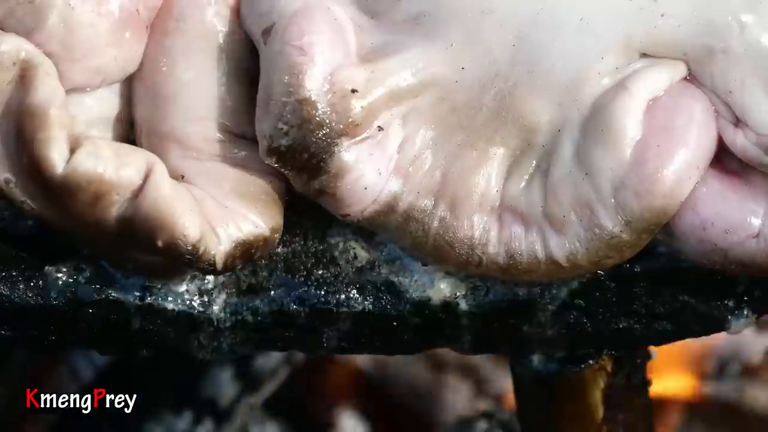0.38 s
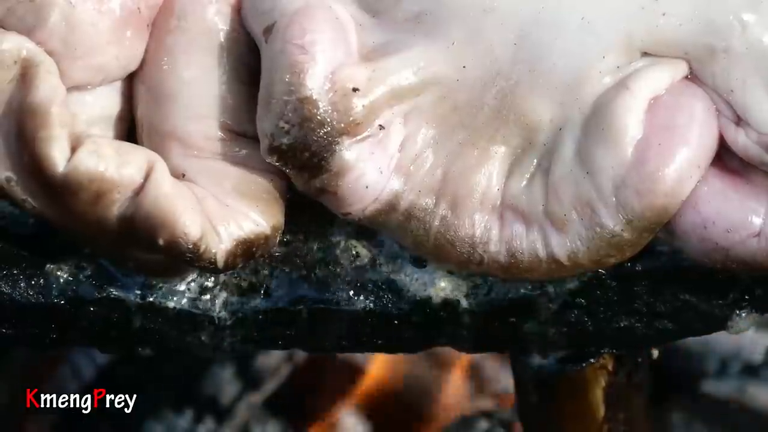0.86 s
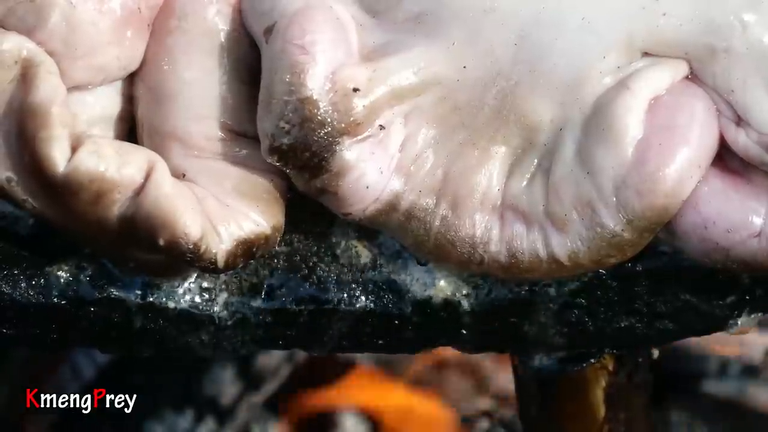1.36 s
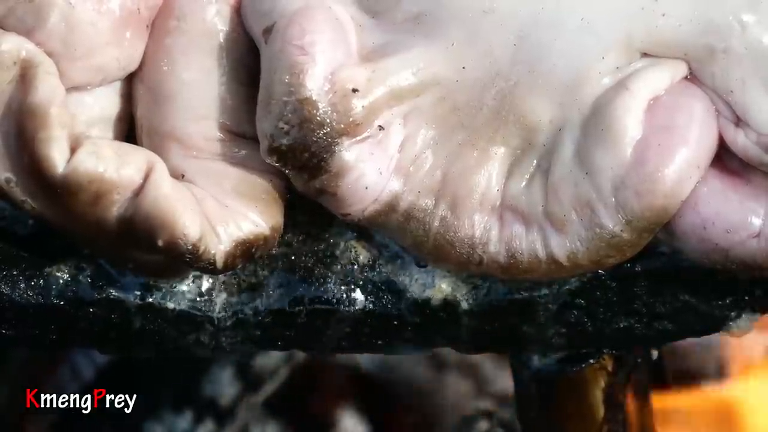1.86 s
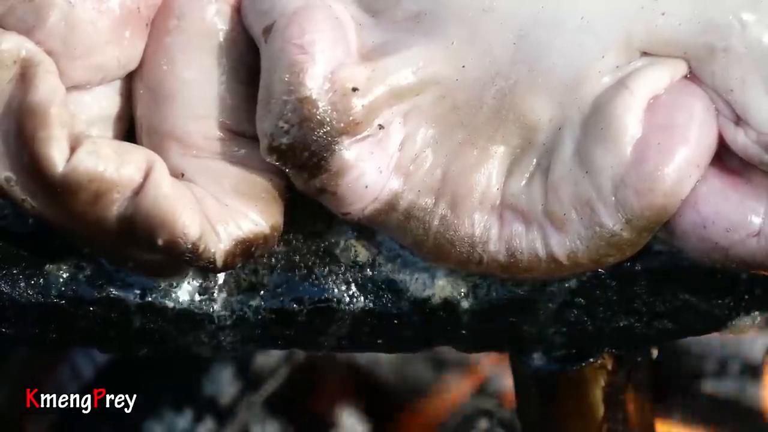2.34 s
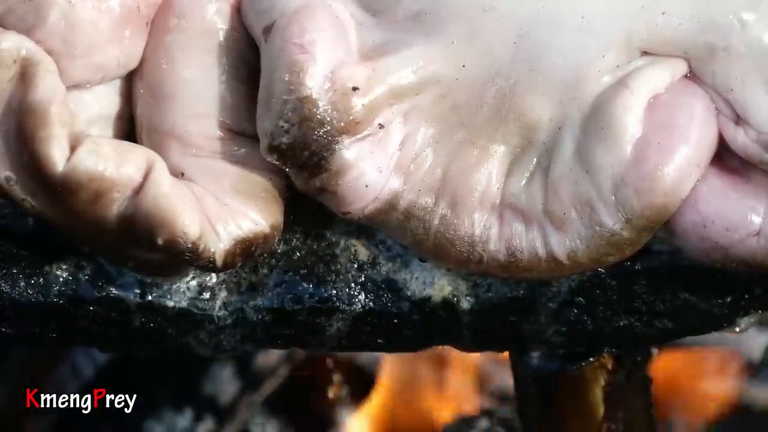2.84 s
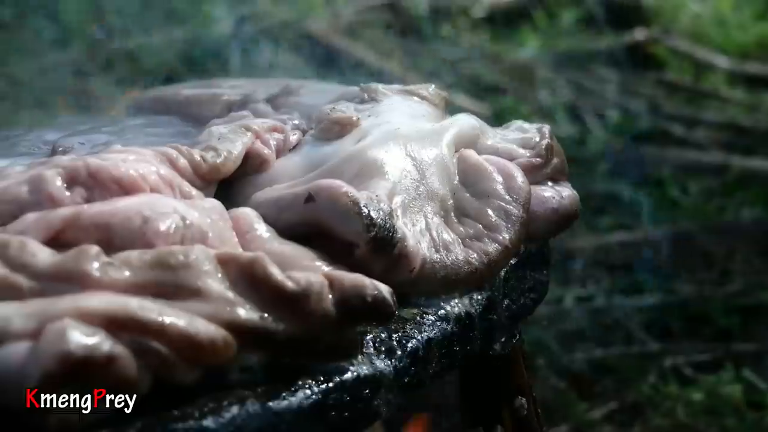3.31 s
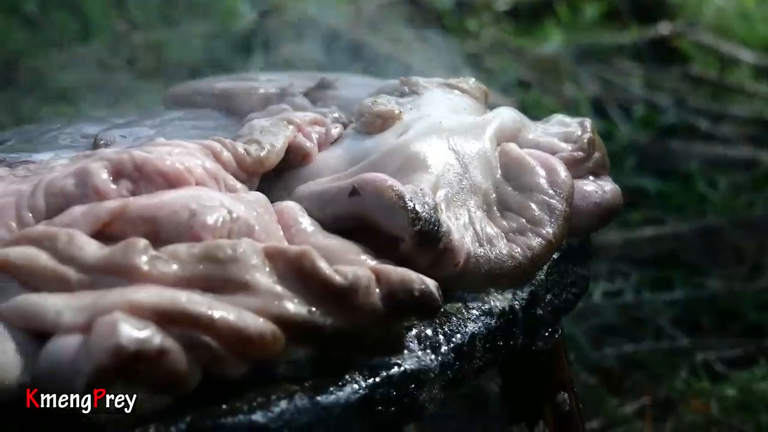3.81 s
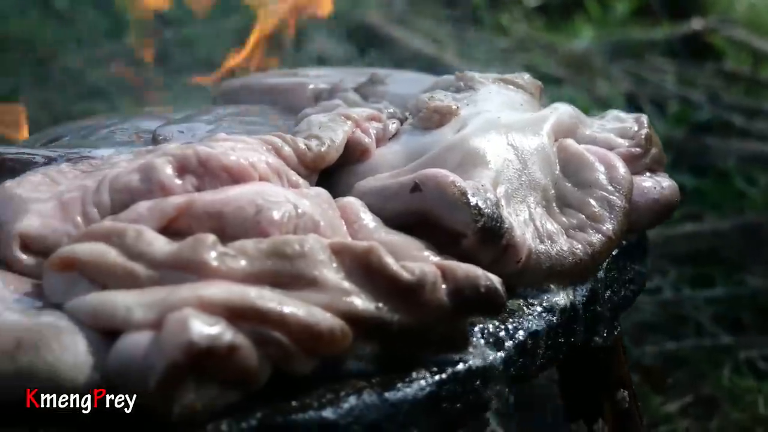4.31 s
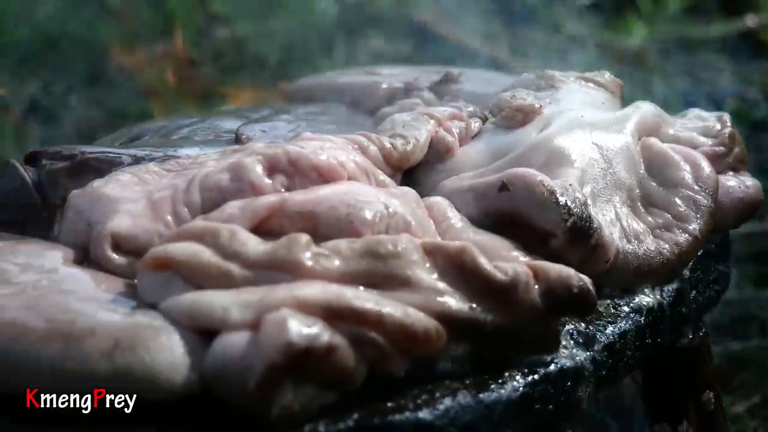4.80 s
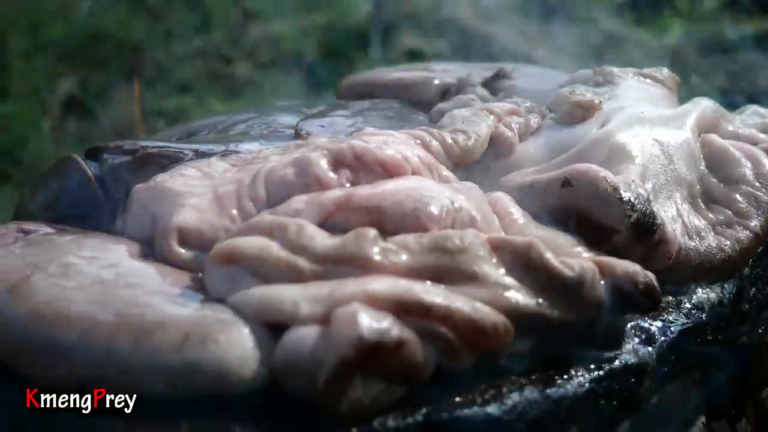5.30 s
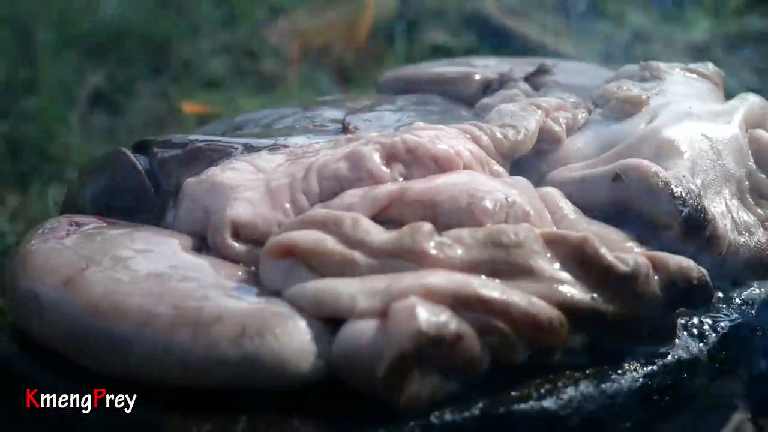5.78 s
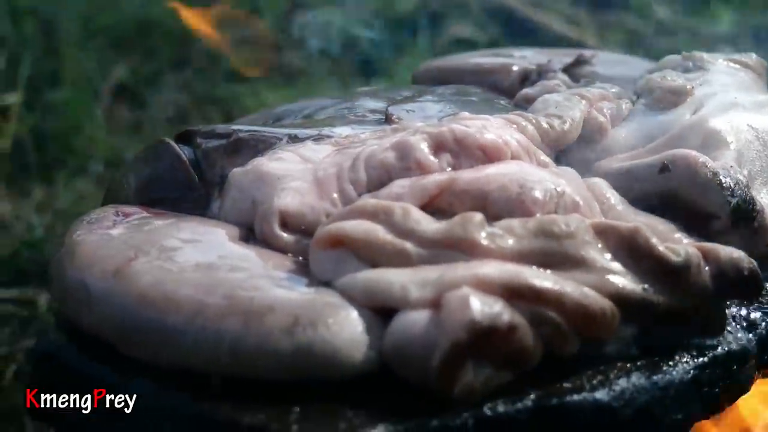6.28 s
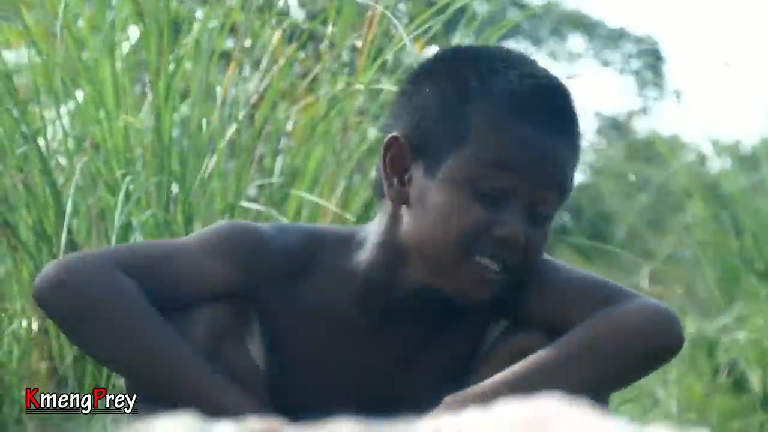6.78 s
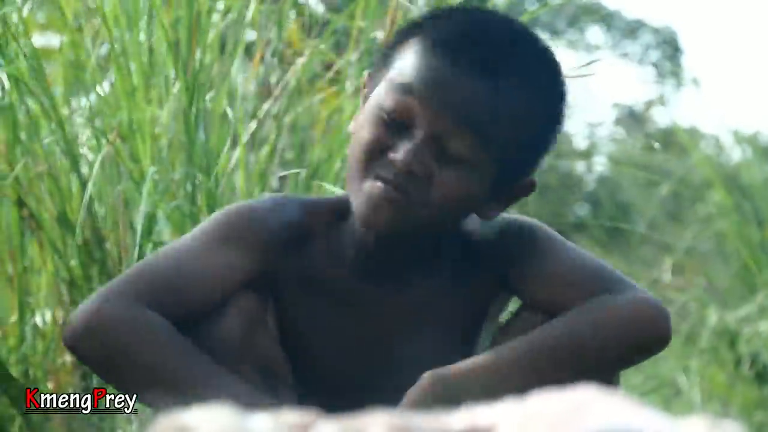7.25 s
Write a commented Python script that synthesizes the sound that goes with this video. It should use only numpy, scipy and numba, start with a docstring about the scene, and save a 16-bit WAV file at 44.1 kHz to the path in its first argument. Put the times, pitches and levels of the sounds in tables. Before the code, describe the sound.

Hollow wooden pounding, about four blows a second at times, over bright crackling fat and low flame flutter, cutting abruptly between near and duller sizzle.

```python
"""Meat sizzles on a hot stone over an open fire while a wooden pestle pounds a wooden mortar nearby.
Four passages are spliced: 0 s, fluttering fire (slow noise) over dull sizzle (hiss, dense bubble bursts and
pops); first blow at 0.12 s (damped modes, crack, soft very low swing); 0.19 and 3.29 s, bright sizzle over
the fire, with brief grainy sprays (noise); 6.49 s, fire over dull sizzle again. After hard blows a late gain
control ducks everything, clipping the first cycles, and the sizzle swells back."""
import sys
import numpy as np
from scipy import signal
from scipy.fft import rfft, irfft, next_fast_len
from scipy.io import wavfile
from scipy.ndimage import uniform_filter1d, minimum_filter1d
from numba import njit

SR = 44100
rng = np.random.default_rng(int(sys.argv[2]) if len(sys.argv) > 2 else 0)


def invert_db(level):
    """Linear amplitude ratio for a level in decibels (20 dB per decade), elementwise."""
    return 10 ** (np.asarray(level, dtype=float) / 20)


def generate_wav(signal):
    """Clip the signal to [-1, 1] and save it as 16-bit WAV at the path in sys.argv[1]."""
    frames = np.transpose(np.atleast_2d(signal))
    scaled = np.clip(frames, -1, 1) * 32767
    pcm = np.round(scaled).astype(np.int16)
    wavfile.write(sys.argv[1], SR, pcm)


N = 336483
T = np.arange(N) / SR


def colour(x, spectrum):
    """Shape a sound by a spectrum, linear in dB over log frequency; rms 1."""
    hz, level_db = np.transpose(spectrum)
    size = next_fast_len(N)
    bin_hz = np.maximum(np.arange(size // 2 + 1) * SR / size, 1)
    gain = invert_db(np.interp(np.log(bin_hz), np.log(hz), level_db))
    y = irfft(rfft(x, size) * gain, size)[:N]
    return y / y.std()


def walk(rate_hz):
    """Random levels held 1 / rate_hz and slewed twice; spread near 1."""
    k = int(SR / rate_hz)
    steps = np.repeat(rng.standard_normal(N // k + 1), k)
    return 1.12 * uniform_filter1d(uniform_filter1d(steps, k), k)[:N]


def filtered(x, order, hz, kind="low"):
    """Butterworth filter."""
    return signal.lfilter(*signal.butter(order, hz, kind, fs=SR), x)


def add(out, start_s, shapes):
    """Mix each row of shapes into out at its time."""
    at = (np.asarray(start_s) * SR).astype(int)[:, None] + np.arange(shapes.shape[1])
    np.add.at(out, np.minimum(at, len(out) - 1), shapes * (at < len(out)))


def bursts(start_times_s, size, pitch_hz, width_hz, phase_turns):
    """Bubbles bursting: a swing or two at their pitch, damped by their width."""
    u, out = np.arange(64) / SR, np.zeros(N)
    pitch_hz = np.clip(pitch_hz, 300, 15000)[:, None]
    width_hz = np.clip(width_hz, 900, 12000)[:, None]
    rise = 1 - np.exp(-u / 3e-5)
    decay = np.exp(-2.4 * width_hz * u)
    swing = np.sin(2 * np.pi * (pitch_hz * u + phase_turns[:, None]))
    add(out, start_times_s / 1 - 1e-4, size[:, None] * rise * decay * swing)
    return out


# Spliced passages: (start_s, carried_gain_reduction_db, sizzle_lowpass_hz, fire_over_sizzle_db before flares)
PASSAGES = [(0, 3.5, 9800, 4.5), (0.191, 10, 18900, -14.5), (3.292, 6, 20200, -12), (6.491, 16, 8200, 2)]


def passage(s, values):
    """The value, of one for each passage, that holds at time s."""
    starts_s = [row[0] for row in PASSAGES]
    return np.asarray(values)[np.maximum(np.searchsorted(starts_s, s, "right") - 1, 0)]


# Fire spectrum: (frequency_hz, relative_level_db)
FIRE_SPECTRUM = [(15, -37), (25, -19.5), (137, -6), (499, -1), (604, -1), (658, -0.5), (944, -4.5),
                 (1350, -9.5), (2670, -8.5), (4000, -17.5), (5200, -19), (8800, -120)]
# Flames flare up or sink: (centre_s, level_change_db, gaussian_length_s)
FLARES = [(1.538, 6, 0.075), (3.2, -2, .2), (3.5, 3.5, 0.18), (5.084, 3, .08), (5.623, 0, .08),
          (5.99, 4.5, 0.29), (6.453, 14.5, 0.11), (6.533, -9.5, 0.12), (7.39, 9, 0.065)]


def fire():
    """Low flutter of flames and draught: coloured noise with slow level swings and Gaussian flares."""
    flutter_db = 3.14 * walk(30) + 0.5 * walk(6)
    flare_db = sum(level_db * np.exp(-((T - centre_s) / length_s) ** 2)
                   for centre_s, level_db, length_s in FLARES)
    over_sizzle_db = passage(T, [row[-1] for row in PASSAGES])
    return colour(rng.standard_normal(N), FIRE_SPECTRUM) * invert_db(flutter_db + flare_db + over_sizzle_db)


# Sizzle spectrum: (frequency_hz, relative_level_db)
SIZZLE_SPECTRUM = [(410, -53), (700, -24), (1060, -12), (2130, -21), (2660, -14), (5610, -9.5), (6650, -8),
                   (7890, -11.5), (10400, -8.5), (14200, -10), (16000, -18.5)]
CRACKLE_RATE_PER_S, CRACKLE_DB, CRACKLE_SPREAD_DB, HISS_DB = 2500, 6, 4.5, 2.5


def frying_bed():
    """Hiss of steam and a dense crackle of bubbles of all sizes, duller from far off."""
    when, big, pitch, wide, phase = rng.random((int(np.ceil(CRACKLE_RATE_PER_S * N / SR)), 5)).T
    size = invert_db(np.minimum(-CRACKLE_SPREAD_DB * np.log(big), 16))
    pitch_hz = 1500 * 9.0 ** pitch
    crackle = bursts(when * N / SR, size * np.sqrt(pitch_hz), pitch_hz,
                     pitch_hz * (0.37 + 0.86 * wide), phase)
    hiss = rng.standard_normal(N) * invert_db(HISS_DB + 2.2 * walk(40))
    mix = hiss + invert_db(CRACKLE_DB) * crackle / crackle.std()
    bed = colour(mix, SIZZLE_SPECTRUM) * invert_db(1.26 * walk(21))
    out = np.zeros(N)
    for start_s, _, lowpass_hz, *_ in PASSAGES:
        heard = filtered(bed, 2, min(lowpass_hz, 21000))
        out = np.where(T >= start_s, heard / heard.std(), out)
    return out


# Loudest bursting fat bubbles: (start_s, relative_level_db, pitch_hz)
POPS = [(.3374, 33.5, 4770), (1.0657, 23, 7150), (1.1015, 37, 8100), (1.1159, 38, 9900), (1.1263, 36, 5300),
        (1.1656, 32, 7000), (1.181, 41, 8900), (1.37, 41, 7400), (1.5204, 32, 6200), (1.6413, 37, 6560),
        (1.7314, 39, 6600), (2.0048, 33, 4500), (2.1225, 41, 6800), (2.3172, 34, 7100), (2.3893, 45, 9400),
        (2.4001, 39, 6050), (2.511, 38, 6200), (2.5273, 38.5, 6900), (2.642, 37, 11500),
        (2.8293, 35.5, 7100), (3.0899, 33, 4500), (3.1459, 32.5, 4800), (3.2939, 30, 5800),
        (3.3167, 34, 9300), (3.328, 40.5, 10200), (3.383, 32, 9500), (3.4224, 34.5, 10800),
        (3.435, 34, 5350), (3.474, 34, 7700), (3.657, 34, 5930), (3.7861, 33.5, 6200), (3.975, 40.5, 9100),
        (3.991, 39, 4500), (4.0591, 38, 4280), (4.2107, 37.5, 6275), (4.4682, 42.5, 8160),
        (4.5437, 30, 7600), (4.6597, 39, 7160), (4.689, 33.5, 6450), (4.75, 31, 7300), (4.8167, 31, 10600),
        (4.8557, 32.5, 5100), (4.8919, 35, 4860), (4.9002, 40.5, 7800), (4.924, 34.5, 7200),
        (5.2773, 38, 10400), (5.2847, 38, 8360), (5.3365, 33, 7400), (5.4299, 33, 5300), (5.4708, 34, 5300),
        (5.596, 36, 9400), (5.7044, 39, 8100), (5.8362, 37, 3500), (6.0277, 32.5, 7400), (6.302, 26, 10100),
        (6.4261, 45, 8350), (6.4595, 39, 5900), (6.713, 39, 4630), (6.7547, 38, 5300), (6.82, 26, 11000),
        (7.127, 40, 10800), (7.17, 28, 12000), (7.25, 36, 9000), (7.275, 28, 8000), (7.4, 30, 7000)]
POP_WIDTH_PER_PITCH, POPS_ABOVE_HZ, SPATTER_DB, SPATTER_DECAY_S = 1.02, 800, -10, .001
SMALL_POPS, SMALL_POP_MIN_DB, SMALL_POP_RANGE_DB = 260, 23, 9


def pops():
    """Single loud bubble bursts, listed and random, each trailed by a short spatter of droplets."""
    when, big, pitch = rng.random((SMALL_POPS, 3)).T
    small_db = SMALL_POP_MIN_DB + SMALL_POP_RANGE_DB * big ** 2
    small = np.transpose([when * N / SR, small_db, 4500 * 2.8 ** pitch])
    start_s, level_db, pitch_hz = np.vstack([POPS, small]).T
    wide, phase = rng.random((len(start_s), 2)).T
    width_hz = POP_WIDTH_PER_PITCH * pitch_hz * (0.54 + 1.32 * wide)
    # bubbles this small push no bass
    out = filtered(bursts(start_s, invert_db(level_db), pitch_hz, width_hz, phase), 2, POPS_ABOVE_HZ, "high")
    spatter = rng.standard_normal(256) * np.exp(-np.arange(256) / SR / SPATTER_DECAY_S)
    return out + invert_db(SPATTER_DB) * np.convolve(out, spatter / np.linalg.norm(spatter))[:N]


def sizzle():
    """Frying fat: steady bed plus pops, rms 1."""
    out = frying_bed() + pops()
    return out / out.std()


# Mortar modes: main, lower, upper, side, then those that hard contact wakes:
# (multiple_of_main_pitch, level_db, share_of_main_t60, sign)
MODES = [(1, 0, 1, 1), (.89, 0, 1, 1), (1.79, 0, .42, -1), (1.12, -20, .7, 1), (2.3, -7, .15, -1),
         (3.15, -9, .12, 1), (3.85, -10, .1, -1), (4.9, -22, .12, 1)]
# Mortar as heard in each passage: (lower_ring_db, upper_ring_db)
MORTAR_HEARD = [(-19, -5.5), (-44.5, -9.5), (-2, -11), (-3, -16)]
SETTLE_S = 0.022


def bowl_ring(u, start_s, pitch_hz, t60_s, hard_db):
    """Damped modes; the two close low ones beat, hard contact starts faster and wakes the upper ones."""
    lower_db, upper_db = (passage(start_s, column) for column in np.transpose(MORTAR_HEARD))
    chance = rng.standard_normal((len(start_s), len(MODES)))
    ring = 0
    for k, (multiple, mode_db, share, sign) in enumerate(MODES):
        blow_db = (0, lower_db, upper_db + chance[:, [k]], 0, hard_db + 2 * chance[:, [k]])[min(k, 4)]
        detune = 1 + .015 * (k > 1) * chance[:, [k - 1]]
        decay = np.exp(-np.log(1000) * u / (share * t60_s))
        swing = np.sin(2 * np.pi * pitch_hz * multiple * detune * u)
        ring = ring + np.sign(sign) * invert_db(mode_db + blow_db) * decay * swing
    rise = 1 - np.exp(-u / (0.0004 * invert_db(-.8 * hard_db)))
    # the pestle comes to rest in the mash and smothers the ring
    smother = np.exp(-(u / SETTLE_S) ** 2)
    return ring * rise * smother / (1 + invert_db(lower_db))


# Pestle blows; rows some 13 ms after a blow are rebounds:
# (start_s, strength_db, main_pitch_hz, main_t60_s before smothering, hardness_db)
BLOWS = [(0.1173, 11.5, 696, 0.058, -6.5), (0.3546, 13.5, 678, 0.03, -19), (0.3942, 15, 680, 0.051, -8),
         (.592, -13, 676, 0.037, -17), (0.614, 10.5, 684, 0.052, -8.5), (.628, 9, 660, 0.084, -22),
         (1.409, -11.5, 720, 0.057, -4), (1.887, 22.5, 670, 0.092, -9.5), (2.1635, 16, 665, 0.035, -22),
         (2.424, 18.5, 695, 0.052, -13.5), (2.4365, 14.5, 657, 0.043, -21), (2.7022, 17, 684, 0.042, -10),
         (2.9636, 13, 693, 0.055, -7.5), (3.214, 14.5, 673, 0.046, -10), (3.226, 9, 689, 0.065, -27),
         (3.5227, 13.5, 663, 0.072, -0.5), (3.534, 0, 675, 0.11, -8), (3.7326, 1.5, 638, 0.042, -7),
         (3.7793, -8.5, 675, 0.056, -2), (4.0275, -6, 680, 0.043, -10), (4.05, -2, 654, 0.067, -1.5),
         (4.323, 2.5, 650, 0.065, -7), (4.336, -8, 640, 0.12, -14), (4.386, -17, 706, 0.032, 17),
         (4.9415, 3.5, 654, 0.078, -6), (4.955, -3, 678, 0.11, 0.5), (5.2048, -3, 637, 0.046, 1),
         (5.2236, -3, 662, 0.072, -6), (5.751, 3, 642, 0.047, -11.5), (5.764, -12, 690, 0.057, -10),
         (6.0643, 9, 660, 0.048, 4), (6.325, 10, 673, 0.089, 5), (6.5288, 7, 640, 0.05, -26),
         (6.6025, 12, 640, 0.038, -27.5), (6.6206, 15, 678, 0.037, -27), (6.6398, 11.5, 652, 0.049, -23.5),
         (6.8913, 15, 656, 0.2, 2), (7.0858, 9, 656, 0.069, -7.5), (7.3521, 28.5, 637, 0.086, -14),
         (7.5432, 17.5, 659, 0.14, -5.5)]
CRACK_DB, CRACK_DECAY_S, CRACK_LOWPASS_HZ, RADIATES_ABOVE_HZ = -32.5, 0.00051, 4000, 494
PUSH_DB, PUSH_S = -31.5, 0.00068
LOW_SWING_DB, LOW_SWING_HZ, LOW_SWING_S = -54, 18, 0.022
ECHO_DB, ECHO_DECAY_S = -32, 0.03


def mortar():
    """Each blow gives the bowl's ring, a contact crack, an air push and a soft, very low swing."""
    start_s, strength_db, pitch_hz, t60_s, hard_db = np.transpose(BLOWS)[:, :, None]
    at_s = start_s[:, 0]
    u, out = np.arange(int(.25 * SR)) / SR, np.zeros(N)
    ring = bowl_ring(u, start_s, pitch_hz, t60_s, hard_db)
    grit = filtered(rng.standard_normal((len(BLOWS), len(u))), 1, CRACK_LOWPASS_HZ)
    crack = invert_db(CRACK_DB + hard_db) * np.exp(-u / CRACK_DECAY_S) * grit
    add(out, at_s, invert_db(strength_db) * (crack - ring))
    # the bowl is too small to radiate bass
    out = signal.sosfilt(signal.butter(4, RADIATES_ABOVE_HZ, "high", fs=SR, output="sos"), out)
    # the contact itself pushes the air once
    push = u / PUSH_S * np.exp(1 - u / PUSH_S) * (1 - u / (2 * PUSH_S))
    add(out, at_s, invert_db(strength_db + PUSH_DB) * push)
    # a soft, very low swing after each blow, as the level settles
    swell = u / LOW_SWING_S * np.exp(1 - u / LOW_SWING_S)
    low_swing = swell * np.sin(2 * np.pi * LOW_SWING_HZ * u)
    add(out, at_s, invert_db(strength_db + LOW_SWING_DB) * low_swing)
    # ground and bushes scatter a faint, short tail
    scatter = rng.standard_normal(len(u)) * np.exp(-u / ECHO_DECAY_S) * (u > .01)
    return out + invert_db(ECHO_DB) * signal.fftconvolve(out, scatter / np.linalg.norm(scatter))[:N]


# Dense crackle, fat spitting, the pestle scraping down, or a light knock (5.929 s):
# (peak_s, level_db, rise_s, fall_s, centre_hz)
SPRAYS = [(0.339, -13.5, 0.0011, 0.0039, 6000), (3.874, 8.5, 0.0012, 0.0069, 4000),
          (3.8805, -1, 0.0044, 0.012, 3780), (4.718, -9, .001, 0.0016, 2800),
          (4.993, -4.5, 0.0018, 0.0022, 1500), (5.929, -7.5, 0.0012, 0.0021, 1460),
          (6.682, -18.5, .001, 0.0022, 2200), (6.89, -18.5, 0.027, 0.0024, 4630),
          (7.347, -26.5, 0.045, 0.0014, 3500), (7.492, -13.5, 0.0035, 0.0046, 6000)]


def sprays():
    """Broad noise broken into grains, swelling and dying fast."""
    out = np.zeros(N)
    grit = rng.standard_normal(N) * invert_db(2.55 * walk(1200))
    for peak_s, level_db, rise_s, fall_s, centre_hz in SPRAYS:
        shape = np.exp(-np.where(T < peak_s, (peak_s - T) / rise_s, (T - peak_s) / fall_s))
        band_hz = [centre_hz / 3, min(centre_hz * 2.5, 20000)]
        out += invert_db(level_db) * filtered(grit * shape, 1, band_hz, "band")
    return out


# How fiercely the fat fries, before gain control, one curve a passage: (time_s, sizzle_level_db)
HEAT = [
    [(0, -42.5), (.19, -52)],
    [(.19, -22), (.6, -34), (.9, -24.5), (1.85, -23), (2.6, -27), (2.9, -27), (3.29, -34.5)],
    [(3.29, -22), (3.5, -13), (3.75, -23.5), (4.0, -23), (4.3, -23.5), (5.05, -23.5), (5.3, -27),
     (6.05, -26.5), (6.2, -22.5), (6.49, -29)],
    [(6.49, -33), (6.7, -36.5), (6.85, -35), (7.2, -44), (7.4, -34.5), (7.63, -29.5)],
]


def scene():
    """Stone, fire and mortar at one microphone; the fire follows the frying and flares on its own."""
    heat_db = np.zeros(N)
    for (start_s, *_), curve in zip(PASSAGES, HEAT):
        heat_db = np.where(T >= start_s, np.interp(T, *np.transpose(curve)), heat_db)
    hearth = invert_db(heat_db) * (fire() + sizzle())
    return (hearth + mortar() + sprays())[None]


@njit
def ride(x, carried, attack, hold, release):
    """Peak follower with hold in samples; restarts where a carried level is given."""
    e, wait, out = 0., 0., np.empty(len(x))
    for i in range(len(x)):
        if carried[i] > 0:
            e, wait = carried[i], hold
        if x[i] > e:
            e, wait = e + attack * (x[i] - e), hold
        elif wait > 0:
            wait -= 1
        else:
            e *= release
        out[i] = e
    return out


def roll_off(x):
    """The treble ends steeply here."""
    return signal.sosfilt(signal.butter(12, 16160, fs=SR, output="sos"), x)


CEILING_DB, ATTACK_S, HOLD_S, RELEASE_DB_PER_S = -1.5, 0.00071, 0.031, 96
RUMBLE_DB, RUMBLE_LOWPASS_HZ, SELF_NOISE_DB, TOP_HZ = -65.5, 70, -57, 16000


def record(dry):
    """Gain control pulls peaks to its ceiling late; overshoot clips; electronics hiss and rumble faintly."""
    ceiling, carried = invert_db(CEILING_DB), np.zeros(N)
    for start_s, reduction_db, *_ in PASSAGES:
        carried[int(max(start_s, 0) * SR)] = ceiling * invert_db(reduction_db)
    # largest peak of the last 33 samples
    peak = -minimum_filter1d(-np.abs(dry[0]), size=33, origin=16)
    envelope = ride(peak, carried, 1 / (ATTACK_S * SR), HOLD_S * SR, float(invert_db(-RELEASE_DB_PER_S / SR)))
    limited = np.clip(dry * ceiling / np.maximum(envelope, ceiling), -1, 1)
    rumble = filtered(rng.standard_normal(N), 2, RUMBLE_LOWPASS_HZ)
    hiss = invert_db(SELF_NOISE_DB) * rng.standard_normal(N)
    mix = limited + invert_db(RUMBLE_DB) * rumble / rumble.std() + hiss
    mix = signal.sosfilt(signal.ellip(10, .2, 60, TOP_HZ, fs=SR, output="sos"), mix)
    return roll_off(mix)


dry = scene()
out = record(dry)
generate_wav(out)
```